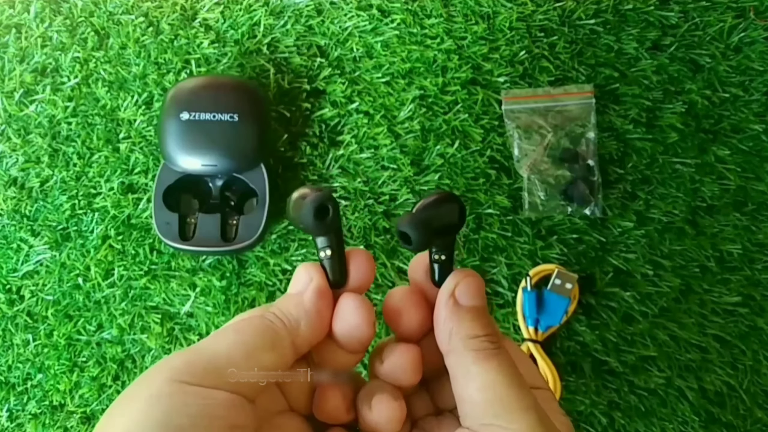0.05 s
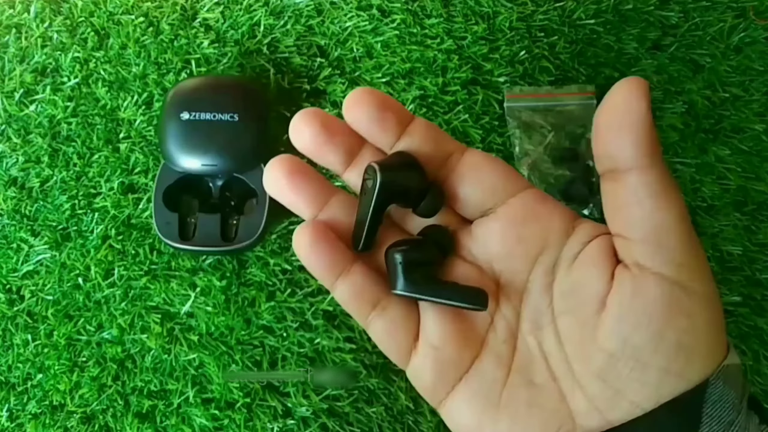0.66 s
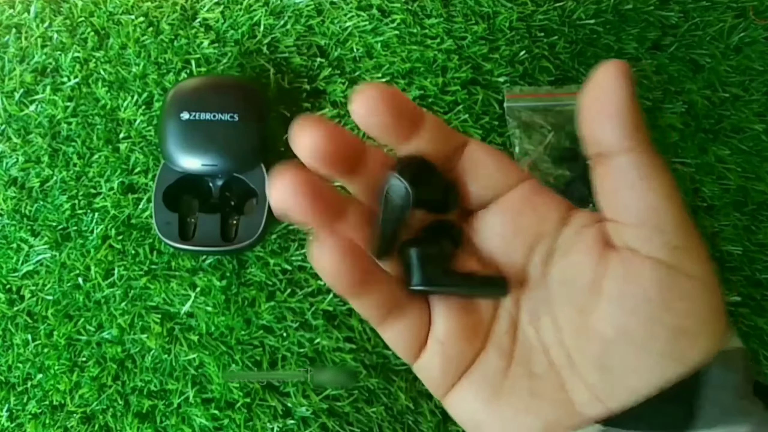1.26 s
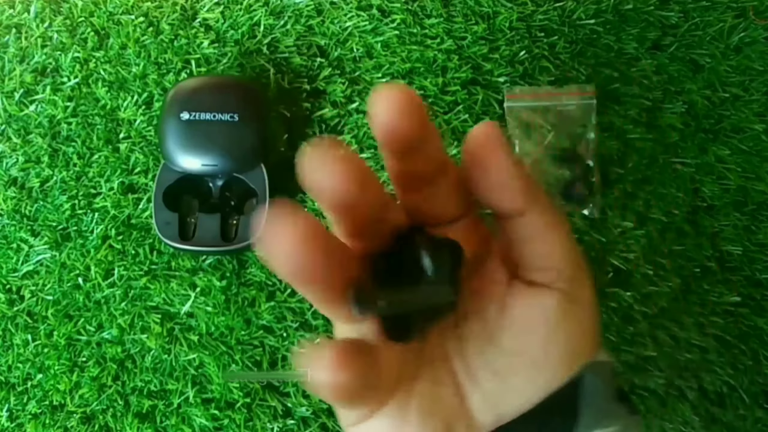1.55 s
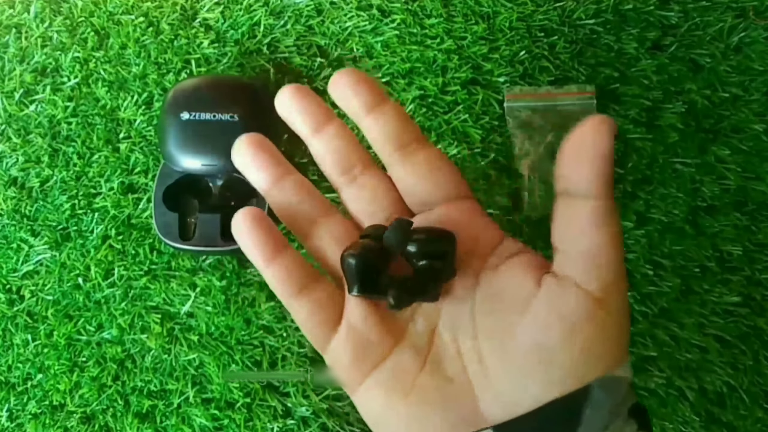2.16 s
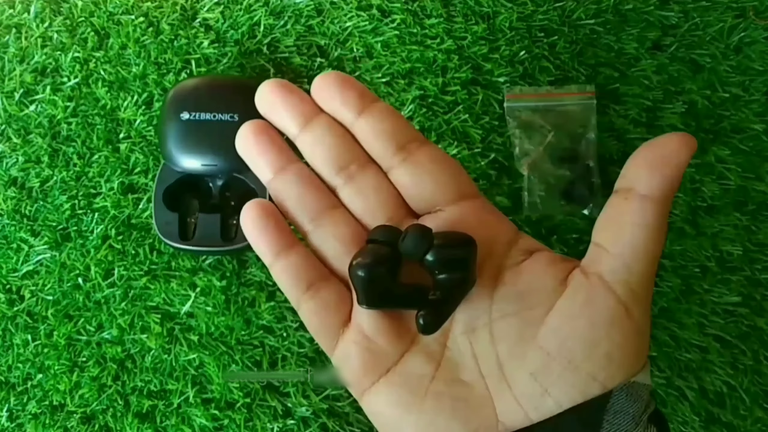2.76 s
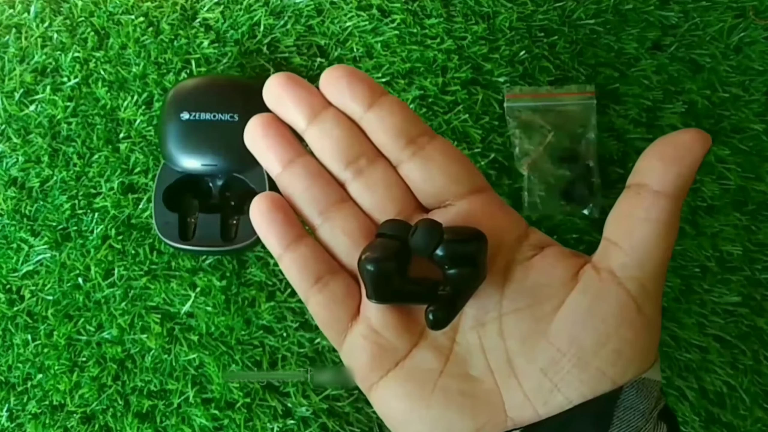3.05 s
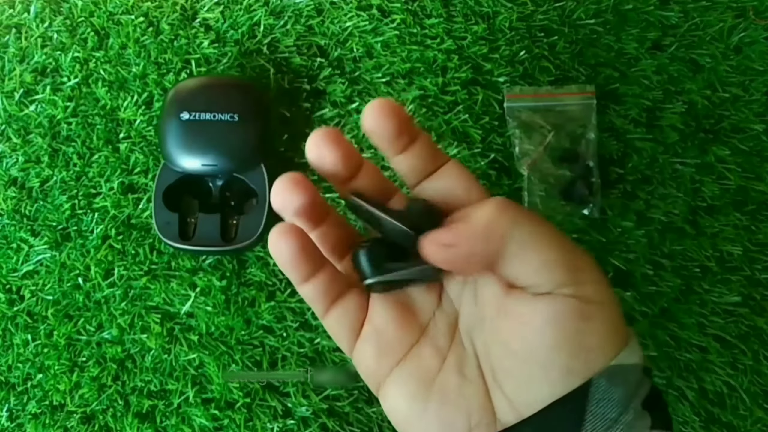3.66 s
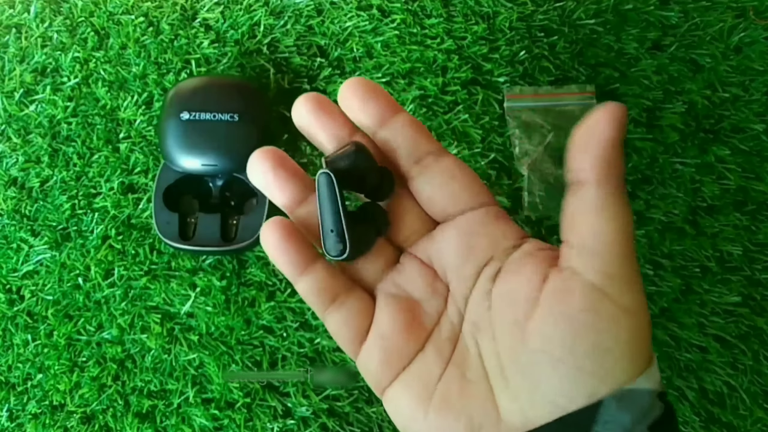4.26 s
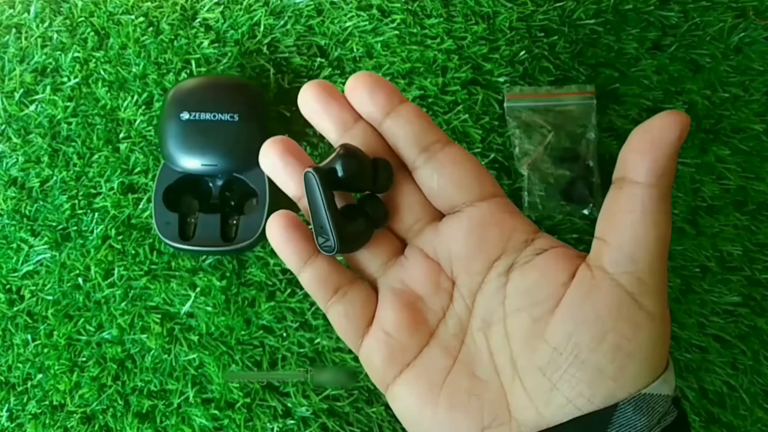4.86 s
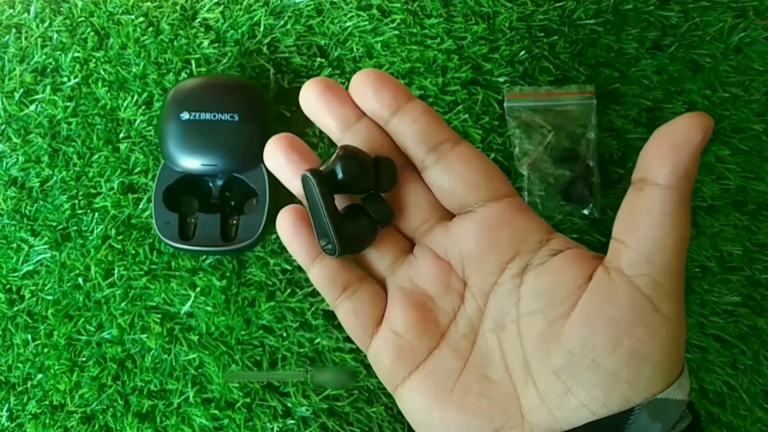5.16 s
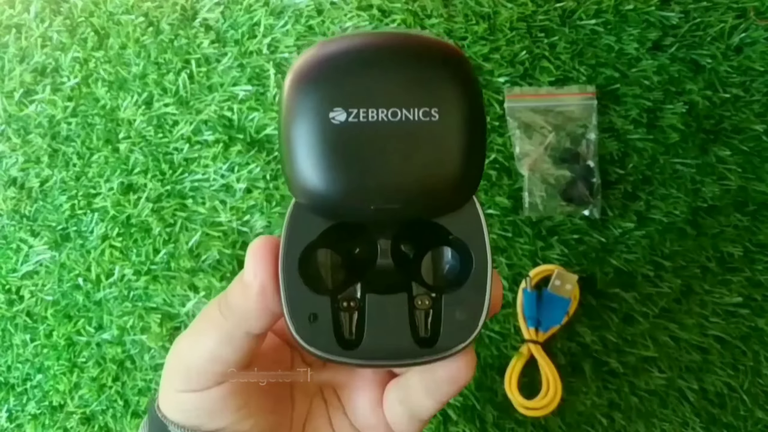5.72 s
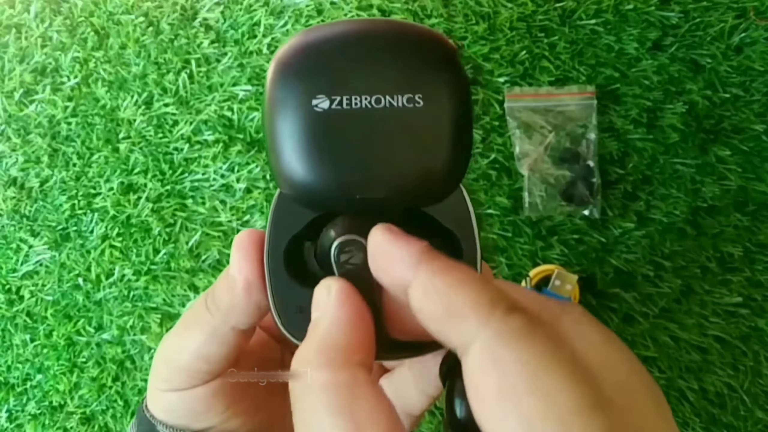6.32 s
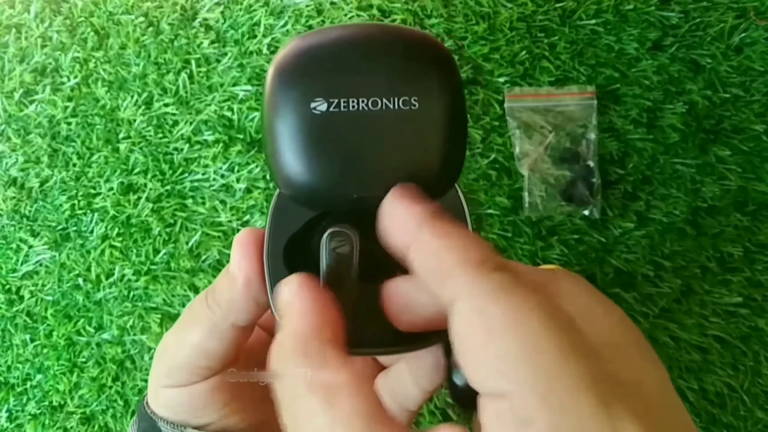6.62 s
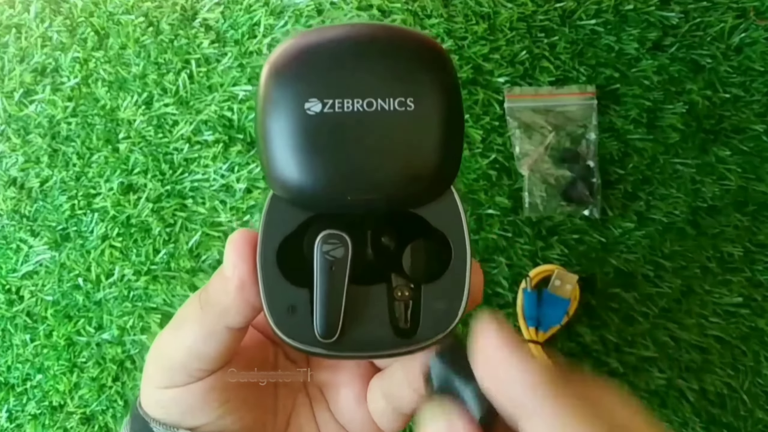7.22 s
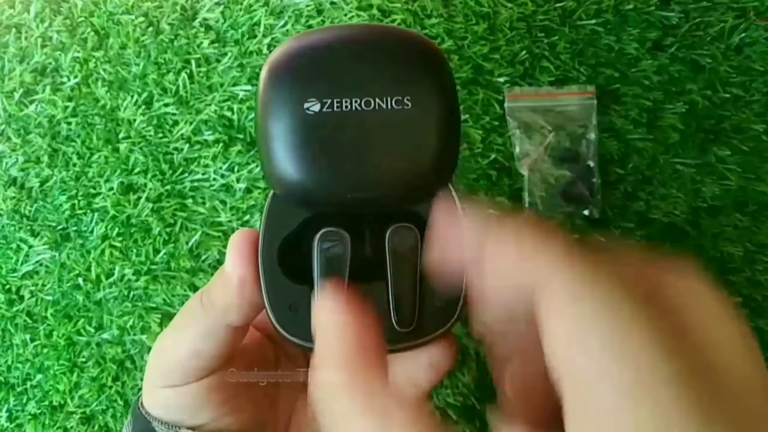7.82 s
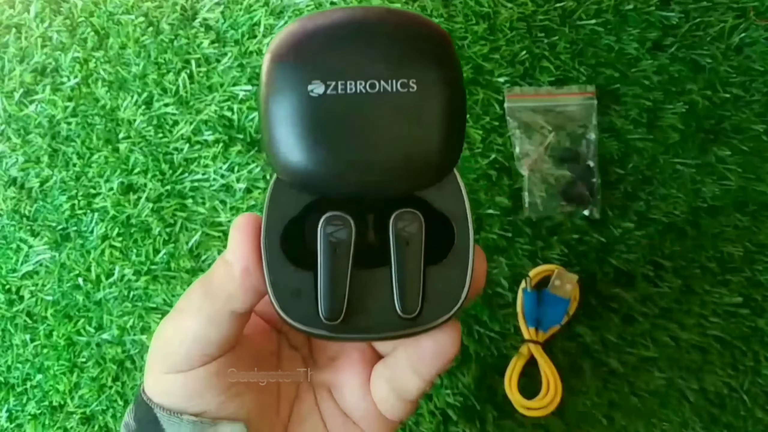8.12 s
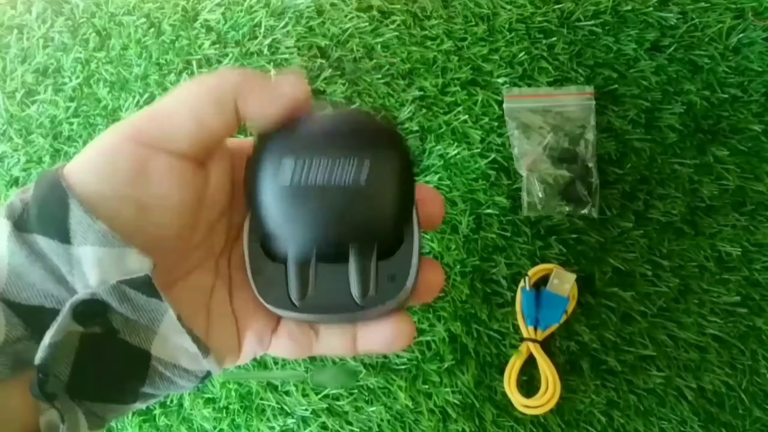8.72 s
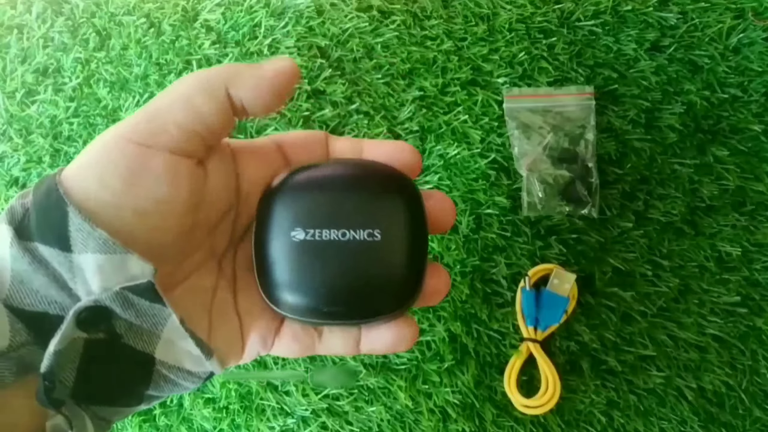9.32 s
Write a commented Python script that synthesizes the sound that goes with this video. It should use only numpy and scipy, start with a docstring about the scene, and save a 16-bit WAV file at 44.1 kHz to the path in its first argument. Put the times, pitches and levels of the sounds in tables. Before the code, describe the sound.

Two plastic earbuds are rolled in a palm close to the microphone, with soft skin rubs, light clicks and a brief tumble. Each then snaps loudly into a hollow plastic charging case, and the lid rasps along its rails and clacks shut. A fan hums low in the room throughout, while a few bird chirps and a short, distant vehicle horn come in from outside.

```python
"""A room with a fan humming, birds and a far vehicle horn coming in from outside. Close to a two-port
microphone, two earbuds are rolled in a palm: skin rubs and squeaks, the shells click and tumble.
They snap into their charging case, ringing the plastic and the air in its hollows; then the lid rasps
along its rails and shuts. At this distance the snaps overload the input."""
import sys
import numpy as np
from scipy import signal
from scipy.fft import rfft, irfft, next_fast_len
from scipy.io import wavfile
from scipy.ndimage import uniform_filter1d

SR = 44100
rng = np.random.default_rng(int(sys.argv[2]) if len(sys.argv) > 2 else 0)


def bounce(signal):
    """Save signal as a 16-bit WAV file at the path given by the first command-line argument."""
    frames = np.transpose(np.atleast_2d(signal))
    limited = np.clip(frames, -1, 1)
    pcm = np.round(limited * 32767).astype(np.int16)
    wavfile.write(sys.argv[1], SR, pcm)


N = 418068
ROOM_T60_S, ROOM_WET_DB, YARD_T60_S = 0.15, -21.5, 0.48

# how the two ports hear sound from around them: frequency_hz, likeness, left_lag_rad
PORT_RESPONSE = [(30, .3, -1), (100, 1, 0), (500, 0.87, 0.51), (1150, 0.94, 1.01), (1980, 0.41, 1.6),
                 (3685, 0.31, 3), (5900, 0, 4.5), (15000, 0.13, 11)]


def from_db(db):
    """Decibels to gain."""
    return 10 ** (np.asarray(db) / 20)


def unit_rms(x):
    """Scale to rms 1."""
    return x / np.sqrt(np.mean(x ** 2) + 1e-20)


def seconds(length_s):
    """A time axis."""
    return np.arange(int(length_s * SR)) / SR


def add(out, start_s, sound):
    """Mix a sound in at a time."""
    i = max(round(start_s * SR), 0)
    out[:, i:i + sound.shape[-1]] += sound[..., :N - i]


def pan(left_minus_right_db):
    """Gains of the left and right port."""
    return from_db([[left_minus_right_db / 2], [-left_minus_right_db / 2]])


def at_hz(table, hz, column=1):
    """Read one column of a spectrum table on a log-frequency axis."""
    columns = np.transpose(table)
    return np.interp(np.log(hz + 1), np.log(columns[0]), columns[column])


def butter(x, hz, kind, order=2):
    """Causal low- or high-pass."""
    return signal.sosfilt(signal.butter(order, min(hz, .45 * SR), kind, fs=SR, output="sos"), x)


def wander(size, rate_hz):
    """A smooth random drift with a spread of about 1."""
    return unit_rms(butter(rng.standard_normal(size + SR), rate_hz, "low"))[-size:]


def rough_tone(pitch_hz, width_hz):
    """Narrow noise carried on a pitch."""
    phase = 2 * np.pi * np.cumsum(pitch_hz) / SR
    size = len(phase)
    return unit_rms(wander(size, width_hz) * np.sin(phase) + wander(size, width_hz) * np.cos(phase))


def resonate(x, modes):
    """Parallel resonances of alternating sign."""
    out = 0
    for k, (hz, width_hz, db) in enumerate(modes):
        radius = np.exp(-np.pi * width_hz / SR)
        gain = (-1) ** k * from_db(db) * (1 - radius ** 2) / 2
        feedback = [1, -2 * radius * np.cos(2 * np.pi * hz / SR), radius ** 2]
        out = out + signal.lfilter([gain, 0, -gain], feedback, x)
    return out


def diffuse(size, spectrum=None):
    """Noise from all around: alike at both ports in the bass, unrelated in the treble."""
    padded = next_fast_len(size)
    mid, side = rfft(rng.standard_normal((2, padded)))
    hz = np.arange(len(mid)) * SR / padded
    alike = np.clip(at_hz(PORT_RESPONSE, hz), -1, 1)
    colour = 1 if spectrum is None else from_db(at_hz(spectrum, hz))
    left_right = np.sqrt(1 + alike) * mid + np.sqrt(1 - alike) * side * [[1], [-1]]
    return unit_rms(irfft(colour * left_right, padded)[:, :size])


def patchy(x, depth_db):
    """Let neighbouring frequencies swell and fade together in brief patches."""
    spectra = signal.stft(x, nperseg=1024)[2]
    swells = uniform_filter1d(rng.standard_normal(spectra.shape[1:]), size=4, axis=0)
    swells = unit_rms(uniform_filter1d(swells, size=6, axis=1))
    return unit_rms(signal.istft(spectra * from_db(depth_db * swells), nperseg=1024)[1][:, :N])


def reverberate(x, t60_s, wet_db, wall_hz):
    """Direct sound plus a dense, duller tail."""
    t = seconds(t60_s)
    tail = butter(diffuse(len(t)), wall_hz, "low", order=1) * from_db(-60 * t / t60_s)
    response = from_db(wet_db) * unit_rms(tail) / np.sqrt(len(t))
    response[:, 0] += 1
    return signal.fftconvolve(np.atleast_2d(x), response, axes=1)


def contacts(touches, modes, crack_db, direct, wet_db=ROOM_WET_DB):
    """Each touch is a dying chatter of tiny impacts that rings a body."""
    out, t = np.zeros((2, N)), seconds(.2)
    grain_db, rise_share = 5, 0.14
    for start, db, chatter_s, low_hz, high_hz, pan_db in touches:
        # part goes straight to both ports, the rest is scattered by the hands
        scatter = direct * rng.standard_normal(len(t)) + diffuse(len(t))
        grain = from_db(grain_db * rng.standard_normal(len(t)))
        envelope = (1 - np.exp(-t / (rise_share * chatter_s))) * np.exp(-t / chatter_s)
        impacts = scatter * grain * envelope + 1e-18
        # a light touch leaves out the lows, a soft one the highs
        force = butter(butter(impacts, low_hz, "high", order=5), high_hz, "low", order=1)
        body = resonate(force, modes) + from_db(crack_db) * force
        sound = reverberate(body, ROOM_T60_S, wet_db, wall_hz=5140)
        # the level counts the energy as if spread over 10 ms
        sound /= np.sqrt(np.sum(sound ** 2, axis=1, keepdims=True) / (.01 * SR))
        add(out, start, from_db(db) * pan(pan_db) * sound)
    return out


def fan_and_street(quiet_hiss_db=-59, hum_waver_db=3.5):
    """Fan turbulence booms in low resonances, with street murk and a fine hiss; all swell together."""
    # resonances of the fan's hum: pitch_hz, width_hz, gain_db
    hum_modes = [(107.6, 13.3, -2), (144.1, 16, -1), (173.2, 13, -6.5), (229, 49, -15.5)]
    # spectra of the street and of the hiss: frequency_hz, density_db
    street_spectrum = [(25, -10), (60, -12.5), (110, 1), (260, 2), (450, -0.5), (700, -6), (1200, -9.5),
                       (2000, -13.5), (3200, -15.5), (5000, -29.5)]
    hiss_spectrum = [(1500, -22), (3000, -15), (4200, 4.5), (5200, 3.5), (6500, 0), (7700, -6.5),
                     (8600, -18), (12000, -13.5), (15000, -15.5)]
    # background hiss, rising through the later part and fading at the end: time_s, level_db
    hiss_levels = [(0, -54.5), (.2, -61.5), (1.3, -56.5), (2.4, -57.5), (3.3, -57.5), (4.7, -60),
                   (5.68, -60.5), (5.85, -50), (6.4, -50.5), (6.6, -42.5), (6.95, -36), (7.3, -45.5),
                   (7.9, -42.5), (8.12, -51.5), (8.85, -52.5), (9.329, -60), (9.48, -82.5)]
    hiss_db = np.interp(np.arange(N) / SR, *np.transpose(hiss_levels))
    swell_db = hiss_db - quiet_hiss_db
    hum_db = -46 + 0.52 * swell_db + hum_waver_db * wander(N, rate_hz=7.9)
    street_db = -48.5 + 0.54 * swell_db
    boom = resonate(diffuse(N), hum_modes)
    hum = unit_rms(butter(butter(boom, 98, "high", order=4), 360, "low"))
    street = patchy(diffuse(N, street_spectrum), depth_db=2.5)
    hiss = patchy(diffuse(N, hiss_spectrum), depth_db=2.6)
    return from_db(hum_db) * hum + from_db(street_db) * street + from_db(hiss_db) * hiss


def thin_ring(pitch_hz=5080, level_db=-69, fade_db=9):
    """A faint, thin 5 kHz ring in the hiss comes and goes."""
    ring = rough_tone(np.full(N, pitch_hz), width_hz=130)
    ring *= from_db(fade_db * np.tanh(wander(N, rate_hz=3)))
    return from_db(level_db) * unit_rms(reverberate(ring, t60_s=.05, wet_db=10, wall_hz=9000)[:, :N])


def skin_rubs(slips_per_s=500, grain_db=5, catch_db=3, ease_s=0.025):
    """Skin sticks and slips under each stroke and hisses when fastest; a low rumble swells with it."""
    # strokes over skin and plastic: start_s, length_s, rub_db, hiss_db, rumble_db
    strokes = [(0.349, 0.21, -59, -49.5, -54.5), (0.579, 0.13, -42.5, -45, -37.5),
               (0.669, 0.33, -49, -79, -39.5), (0.971, 0.21, -44.5, -45, -40.5),
               (1.499, 0.28, -45, -53.5, -37.5), (1.982, 0.28, -44, -38.5, -35),
               (2.46, 0.28, -43, -65, -37), (2.721, 0.33, -51, -64, -39.5), (3.04, 0.15, -60, -59.5, -43.5),
               (3.333, 0.18, -49, -47.5, -42), (3.609, .16, -44, -44, -33),
               (3.744, 0.29, -44.5, -40.5, -33), (4.06, 0.21, -55.5, -49, -43),
               (4.287, 0.14, -43.5, -44, -35), (4.49, 0.16, -52, -55.5, -41.5),
               (4.851, 0.19, -52.5, -50, -41.5), (5.085, 0.19, -52, -55, -42),
               (5.321, .26, -49, -47.5, -37), (5.812, 0.21, -51.5, -47, -42.5),
               (6.47, 0.13, -45, -46.5, -40.5), (8.611, 0.089, -67, -48.5, -50.5)]
    # resonances rung by the slips: pitch_hz, width_hz, gain_db
    rub_modes = [(549, 114, 6.5), (1012, 455, 9.5), (1267, 380, 9.5), (1790, 290, 7.5), (2390, 1100, -1.5),
                 (3220, 1200, 1), (5030, 5500, -9)]
    # spectra of the dry skin's hiss and of the low rumble: frequency_hz, density_db
    skin_spectrum = [(500, -17.5), (1500, -12), (3000, 1.5), (5000, -1), (7500, -5), (8600, -13),
                     (12000, -11), (15000, -15)]
    rumble_spectrum = [(30, -29.5), (70, -22), (105, -3), (140, 4.5), (200, -10), (300, -13.5),
                       (550, -17.5), (1200, -31.5), (4000, -57)]
    gains = np.zeros((3, N))
    for start, length, rub_db, hiss_db, rumble_db in strokes:
        span = length + 2 * ease_s
        speed = np.abs(np.sin(np.pi * seconds(span) / span))
        swells = np.array([speed ** 0.99, speed ** 1.4, speed ** 0.99])
        add(gains, start - ease_s, from_db([[rub_db], [hiss_db], [rumble_db]]) * swells)
    rub_gain, hiss_gain, rumble_gain = gains
    slips = (rng.random(N) < slips_per_s / SR) * from_db(grain_db * rng.standard_normal(N))
    ringing = resonate(slips + 1e-18, rub_modes)
    rub = rub_gain * unit_rms(reverberate(ringing, ROOM_T60_S, wet_db=11, wall_hz=6000)[:, :N])
    catch = from_db(catch_db * wander(N, rate_hz=30))  # the skin catches unevenly
    hiss = hiss_gain * diffuse(N, skin_spectrum)
    return catch * (rub + hiss) + rumble_gain * diffuse(N, rumble_spectrum)


def far_horn(waver=0.005, swell_s=0.054, pan_db=3):
    """A horn's fundamental and the few partials its diaphragm favours, which flutter on the way."""
    # hoots from outside: start_s, length_s, pitch_hz, fundamental_db, ring_db, flutter_db
    hoots = [(0.553, 0.27, 473, -75, -42.5, 19), (0.8, 0.6, 475, -75, -49.5, 10),
             (5.84, 0.35, 442, -54, -45, 20), (6.471, 0.1, 440, -27, -24, 3),
             (6.525, 0.099, 440.3, -24.5, -19, 2.5), (7.299, 0.24, 414.8, -44.5, -66.5, 1)]
    # ring of the diaphragm: harmonic_number, level_db
    partials = [(5, -32), (6, -31.5), (7, -13.5), (8, -24)]
    out = np.zeros((2, N))
    for start, length, hz, fundamental_db, ring_db, flutter_db in hoots:
        t = seconds(length)
        pitch = hz * (1 + waver * wander(len(t), rate_hz=72))
        phase = 2 * np.pi * np.cumsum(pitch) / SR
        ring = sum(from_db(db) * np.sin(k * phase) for k, db in partials)
        ring = unit_rms(ring * from_db(flutter_db * np.tanh(wander(len(t), rate_hz=21))))
        tone = from_db(fundamental_db) * unit_rms(np.sin(phase)) + from_db(ring_db) * ring
        swell = np.minimum(np.minimum(t, length - t) / swell_s, 1) ** 1.2
        add(out, start, reverberate(tone * swell, YARD_T60_S, wet_db=-17, wall_hz=2500))
    return out * pan(pan_db)


def bud_squeaks():
    """A bud dragged over skin or plastic squeaks faintly, swelling and fading on one rough pitch."""
    # drags: start_s, length_s, pitch_hz, width_hz, level_db
    drags = [(0.578, 0.17, 1054, 159.3, -43), (0.68, 0.21, 1183, 160, -48.5), (1.01, 0.23, 1693, 200, -48),
             (2.47, 0.16, 500, 40, -43.5), (6.685, 0.05, 1020, 50, -34.5), (6.781, 0.05, 1104, 39.7, -33.5)]
    out = np.zeros((2, N))
    for start, length, hz, width_hz, db in drags:
        swell = np.sin(np.pi * seconds(length) / length)
        add(out, start, from_db(db) * swell * rough_tone(np.full(len(swell), hz), width_hz))
    return out


def bird_call(glide_hz, depth_hz, wet_db, trill_hz=190, waver=0.4):
    """A gliding whistle with a fast uneven trill, blurred by the yard."""
    t = np.arange(len(glide_hz)) / SR
    trill = np.sin(2 * np.pi * trill_hz * t) + waver * wander(len(t), rate_hz=170)
    phase = 2 * np.pi * np.cumsum(glide_hz + depth_hz * trill) / SR
    swell = np.abs(np.sin(np.pi * t / t[-1])) ** 0.57
    # the call enters by way of nearby walls, so each port gets its own early echoes
    call = reverberate(np.sin(phase) * swell, t60_s=.05, wet_db=11.5, wall_hz=9000)
    call = reverberate(call, YARD_T60_S, wet_db, wall_hz=8190)
    return call / np.sqrt(np.sum(call ** 2, axis=1, keepdims=True) / len(t))


def birds(peep_s=0.14, sweep_hz=1180, rise_s=0.026, pan_db=-3):
    """Outside, a little to the right, one bird whistles short glides and another repeats a thin peep."""
    # whistled notes: start_s, length_s, middle_hz, glide_hz, trill_depth_hz, level_db
    whistles = [(0.623, 0.05, 2530, 160, 85, -43.5), (0.713, 0.061, 2760, -300, 270, -51),
                (3.62, 0.089, 3924, -150, 100, -21), (3.642, 0.074, 3504, 30, 127, -18.5),
                (3.705, 0.095, 3510, -28, 22, -35), (3.804, 0.096, 3900, 350, 380, -24),
                (3.835, 0.07, 3033, -200, 60, -19), (6.648, 0.04, 4360, -250, 40, -36.5),
                (6.676, 0.062, 4097, -56, 170, -22.5), (6.945, 0.072, 2872, 26, 19, -21),
                (7.039, 0.04, 3230, 60, 56, -26), (7.035, 0.066, 2783, -330, 90, -31),
                (7.088, 0.15, 2444, -50, 59, -43), (8.632, 0.21, 2996, -200, 170, -40)]
    # peeps that sweep up and level off: start_s, top_hz, level_db
    peeps = [(5.89, 5740, -42), (6.11, 5750, -43.5), (6.33, 5840, -42.5), (6.54, 5700, -40),
             (6.735, 6970, -42.5), (6.88, 6730, -38.5), (7.05, 6630, -48), (7.21, 6500, -47.5)]
    out = np.zeros((2, N))
    for start, length, middle_hz, glide_hz, depth_hz, db in whistles:
        glide = middle_hz + glide_hz * (seconds(length) / length - .5)
        add(out, start, from_db(db) * bird_call(glide, depth_hz, wet_db=-14))
    for start, top_hz, db in peeps:
        glide = top_hz - sweep_hz * np.exp(-seconds(peep_s) / rise_s)
        add(out, start, from_db(db) * bird_call(glide, depth_hz=170, wet_db=-0.5))
    return out * pan(pan_db)


def hand_bumps(rise_s=0.0017, t60_cycles=17.3):
    """Flesh gives a low, quickly damped thud."""
    # soft bumps of the hand and of the case in it: start_s, peak_db, pitch_hz
    bumps = [(1.375, -30, 154), (1.498, -28.5, 190), (1.647, -20, 164.5), (1.906, -31, 198),
             (2.108, -18, 364), (4.374, -25.5, 135), (6.895, -18, 275), (7.975, -14, 330),
             (8.008, -20.5, 332), (8.04, -26.5, 220), (8.53, -26, 332), (8.966, -19.5, 331),
             (9.029, -11, 242), (9.05, -22, 150)]
    out, t = np.zeros((2, N)), seconds(.2)
    for start, db, hz in bumps:
        envelope = (1 - np.exp(-t / rise_s)) * from_db(-60 * t * hz / t60_cycles)
        thud = np.sin(2 * np.pi * hz * t) * envelope
        add(out, start, from_db(db) * thud / np.abs(thud).max())
    return out


def bud_clicks(firm_db=-15, firm_chatter_s=0.0013, doubling_db=14.5, rebound_s=0.0068, high_hz=6500):
    """Bud strikes bud, rings its shell and rebounds faintly; a light click chatters longer."""
    # bud against bud: start_s, level_db, low_hz, pan_db
    clicks = [(1.494, -21.5, 1000, -0.5), (1.498, -24.5, 2500, -5), (1.9048, -29.5, 900, -8.5),
              (1.982, -39.5, 4480, -10), (2.204, -36, 5200, -6), (3.8358, -9, 1720, -3),
              (4.0713, -35.5, 4600, -3), (4.3714, -17.5, 3600, -4), (4.529, -38, 5050, 0)]
    # earbud shell: pitch_hz, width_hz, gain_db
    shell_modes = [(990, 680, -6.5), (1670, 420, 3), (2130, 940, -3), (2900, 64, 3), (3620, 324, 7.5),
                   (4220, 590, 3), (5030, 280, 5), (7000, 1060, -4.5), (11000, 6200, -21.5)]
    touches = []
    for start, db, low_hz, pan_db in clicks:
        chatter_s = firm_chatter_s * 2 ** ((firm_db - db) / doubling_db)
        touches.append((start, db, chatter_s, low_hz, high_hz, pan_db))
        touches.append((start + rebound_s, db - 13, chatter_s, low_hz, high_hz, 0))
    return contacts(touches, shell_modes, crack_db=-25.5, direct=0.16, wet_db=-18.5)


def palm_tumble():
    """The buds tumble into the cupped palm and ring its hollow."""
    # landings: start_s, level_db, chatter_s, low_hz, high_hz, pan_db
    drops = [(2.061, -30.5, 0.006, 120, 9000, 2), (2.07, -20.5, 0.045, 120, 9000, -2),
             (2.097, -12.5, 0.009, 238, 11000, -0.5), (2.109, -16.5, 0.0096, 181, 3000, 1),
             (2.124, -18, 0.0077, 149, 1500, 0)]
    # hollow of the hand with the buds in it: pitch_hz, width_hz, gain_db
    palm_modes = [(327, 140, 5.5), (727, 100, -9), (973, 73, -3), (1540, 140, -7.5), (1870, 89, 1),
                  (3080, 610, -7), (5870, 1300, -9), (12200, 2600, -40)]
    return contacts(drops, palm_modes, crack_db=-18, direct=0.5, wet_db=-3)


def case_snaps(pan_db=0.9, thump_s=0.033, thump_hz=(55, 130), puff_s=0.0025, puff_hz=(350, 4000)):
    """Each snap rings the plastic and knocks on the air beneath, with a brief low thump under it."""
    # snaps of buds and lid on the case; the row at 6.819 s is a faint bright hiss just before a snap:
    # start_s, level_db, chatter_s, low_hz, high_hz, hollow_db, hollow_hz
    snaps = [(6.5515, -19.5, 0.0017, 705, 2500, -23.5, 994), (6.7873, -47, 0.0018, 750, 800, -25, 985),
             (6.819, -18.5, 0.018, 2200, 6000, -30, 1110), (6.8336, 1.5, 0.0067, 1320, 5000, -3.5, 1232),
             (6.841, -10, 0.005, 1000, 5000, -11, 1010), (6.854, -7.5, 0.011, 695, 7000, -5, 1240),
             (6.8862, -0.5, 0.0085, 990, 7000, -6, 1258), (6.895, -6.5, 0.013, 1000, 5000, -4.5, 1230),
             (7.841, -33.5, 0.004, 400, 1490, -31, 1230), (7.857, -32, 0.0065, 420, 5000, -41, 1150),
             (7.884, -33.5, 0.018, 420, 3000, -42.5, 1150), (7.9645, -19.5, 0.004, 1100, 1000, -22.5, 1750),
             (7.9695, -0.5, 0.006, 1240, 3000, -2.5, 2204), (7.978, 7.5, 0.012, 1390, 8000, -3.5, 1474),
             (7.986, -1, 0.0032, 1500, 8000, -5.5, 2255), (7.995, 0.5, 0.0068, 1140, 7000, -14, 1495),
             (8.007, -9, 0.0023, 1200, 9000, -24.5, 1487), (8.927, -15, 0.016, 2200, 4000, -40, 1400),
             (8.969, -3.5, 0.0059, 1700, 3000, -12, 800), (8.997, -7.5, 0.004, 1500, 6000, -18, 820),
             (9.011, 3.5, 0.0062, 646, 8000, -10, 792), (9.027, -2, 0.009, 1104, 6000, -18, 599),
             (9.041, -4.5, 0.005, 900, 3500, -11, 571)]
    # plastic case: pitch_hz, width_hz, gain_db
    case_modes = [(535, 180, 0), (993, 155, 1.5), (1238, 120, -1.5), (1767, 160, -1.5), (2064, 150, -3),
                  (2267, 110, 0.5), (2650, 91, -4.5), (2984, 220, -1), (3410, 260, -5.5), (4040, 120, 0),
                  (4335, 300, -1.5), (4624, 59, 1), (4990, 160, -3.5), (5700, 350, -2), (6560, 540, -4),
                  (10900, 5000, -31)]
    # air in the hollow under a bud or the lid: pitch_ratio, width_hz, gain_db
    hollow_modes = [(.81, 69.7, -10), (1, 35, -0.5), (1.42, 130, -12)]
    bursts = [(*snap[:5], pan_db) for snap in snaps]
    out = contacts(bursts, case_modes, crack_db=-13, direct=0.65)
    thumps = [(start, db - 28, thump_s, *thump_hz, 0) for start, db, *_ in snaps]
    out += contacts(thumps, modes=[], crack_db=0, direct=0.66)
    for start, *_, hollow_db, hollow_hz in snaps:
        modes = [(ratio * hollow_hz, width_hz, db) for ratio, width_hz, db in hollow_modes]
        puff = (start, hollow_db, puff_s, *puff_hz, pan_db)
        out += contacts([puff], modes, crack_db=-42, direct=2.5)
    return out


def lid_slide(start_s=8.942, attack_s=0.016, run_s=0.086, cover_s=0.082, release_db_per_s=456):
    """The lid catches and slips along its rails until it meets its stop; its spring rings on."""
    # the sliding lid and its spring: pitch_hz, width_hz, gain_db
    lid_modes = [(1140, 220, -8.5), (2100, 64, 6), (2680, 90, 4), (3170, 310, -1.5), (3660, 80, 4),
                 (4520, 280, 2), (5330, 130, -2.5), (6920, 160, 1), (7500, 500, -8.5)]
    spring_modes = [(2150, 18, 9.5), (2880, 14, 8), (4900, 14, 9.5), (6070, 20, 5.5), (6900, 20, 6)]
    # falling rasps of the rails: start_s, length_s, pitch_hz, fall_hz, level_db
    rasps = [(8.945, 0.04, 2700, 150.4, -13), (8.958, 0.066, 2190, 382, -9.5),
             (8.966, 0.05, 4650, 248.4, -16), (9.018, 0.028, 4930, 1093, -16),
             (9.018, 0.032, 1452, 375, -14)]
    grain_db, catch_db, crack_db = 3, 2, -11
    tray_hz, fall_hz_per_s, tray_db = 880, 3000, -10.5
    out, t = np.zeros((2, N)), seconds(.2)
    grain = from_db(grain_db * rng.standard_normal(len(t)) + catch_db * wander(len(t), rate_hz=600))
    friction = butter(diffuse(len(t)) * grain, 7000, "low", order=1)
    scrape = resonate(friction, lid_modes) + from_db(crack_db) * friction
    scrape = unit_rms(butter(scrape, 1800, "high"))
    # the air in the tray sounds louder and lower as it is covered; tray_db is relative to the scrape
    covered = np.minimum(t / cover_s, 1)
    tray_pitch = tray_hz - fall_hz_per_s * np.minimum(t, run_s)
    tray = from_db(tray_db) * covered ** 2 * rough_tone(tray_pitch, width_hz=70)
    push = np.minimum(t / attack_s, 1) * from_db(-4.5 - release_db_per_s * np.maximum(t - run_s, 0))
    slide = push * (scrape + tray) + resonate(push * friction, spring_modes)
    add(out, start_s, reverberate(slide, ROOM_T60_S, ROOM_WET_DB, wall_hz=4000))
    for start, length, hz, fall_hz, db in rasps:
        along = seconds(length) / length
        swell = np.sqrt(np.abs(np.sin(np.pi * along)))
        rasp = from_db(db) * swell * rough_tone(hz - fall_hz * along, width_hz=90)
        add(out, start, reverberate(rasp, ROOM_T60_S, ROOM_WET_DB, wall_hz=4030))
    return out


def at_ports(x, lag_table):
    """Shift the phase at the left port by the lag in the table's last column."""
    lag_rad = at_hz(lag_table, np.fft.rfftfreq(N, 1 / SR), column=-1)
    left = irfft(rfft(x[0]) * np.exp(-1j * lag_rad), N)
    return np.array([left, x[1]])


def scene():
    """Hands and case close to the microphone, with the room and the yard behind them."""
    # the case is held more nearly in front: frequency_hz, left_lag_rad
    case_lag = [(100, -1), (1150, 0.4), (1700, 0.82), (2400, 1.5), (3400, 2.5), (4700, 2.5), (15000, 8)]
    hands = bud_clicks() + palm_tumble() + skin_rubs() + bud_squeaks() + hand_bumps()
    ambience = birds() + thin_ring() + far_horn() + fan_and_street()
    case = case_snaps() + lid_slide()
    return at_ports(hands + ambience, PORT_RESPONSE) + at_ports(case, case_lag)


def record(dry):
    """The close snaps clip the input; a steep low-pass cuts the top."""
    cutoff_hz = 15400
    low_pass = signal.ellip(10, .1, 70, cutoff_hz, fs=SR, output="sos")
    return signal.sosfilt(low_pass, np.clip(dry, -1, 1))


dry = scene()
out = record(dry)
bounce(out)
```